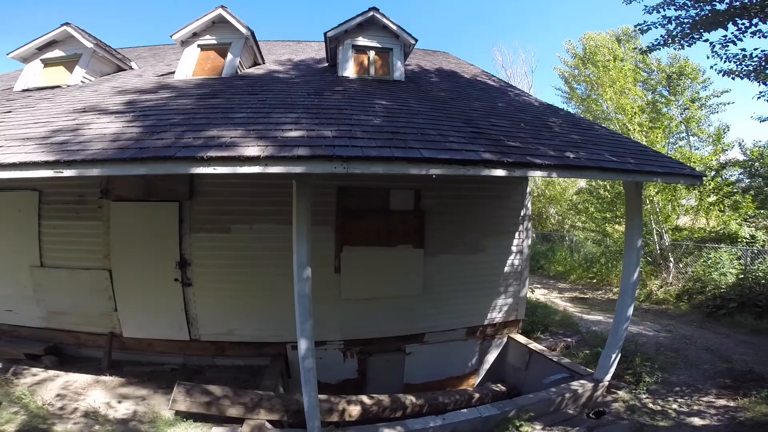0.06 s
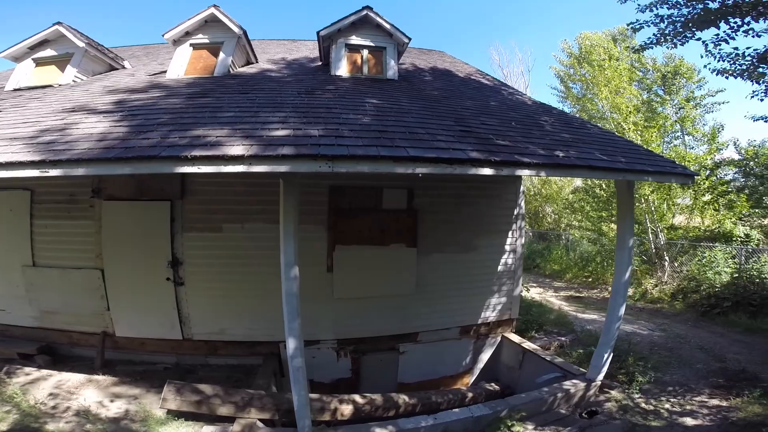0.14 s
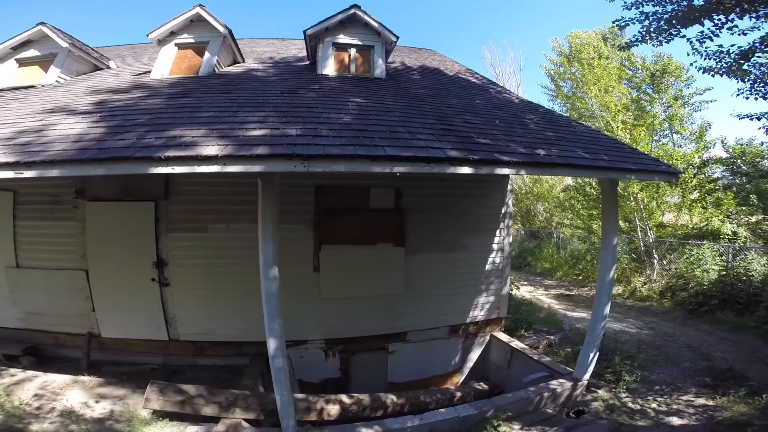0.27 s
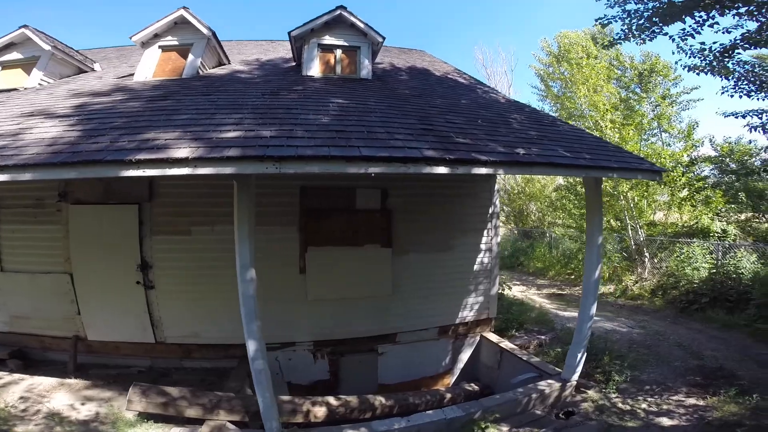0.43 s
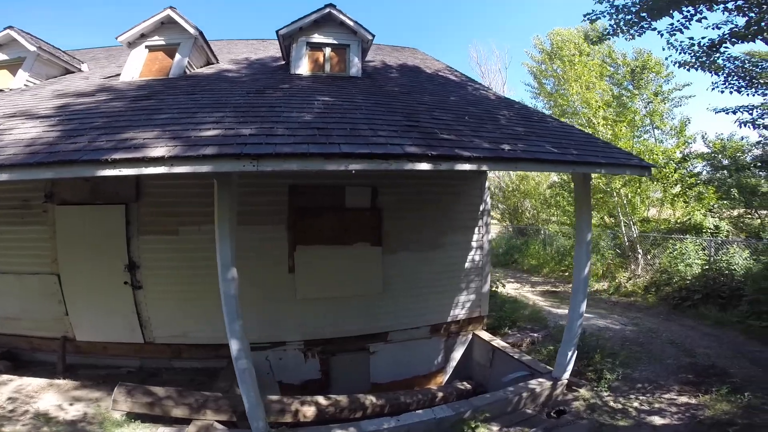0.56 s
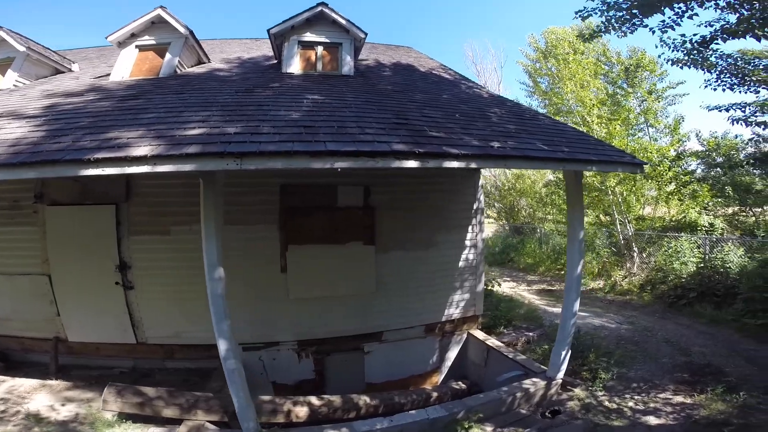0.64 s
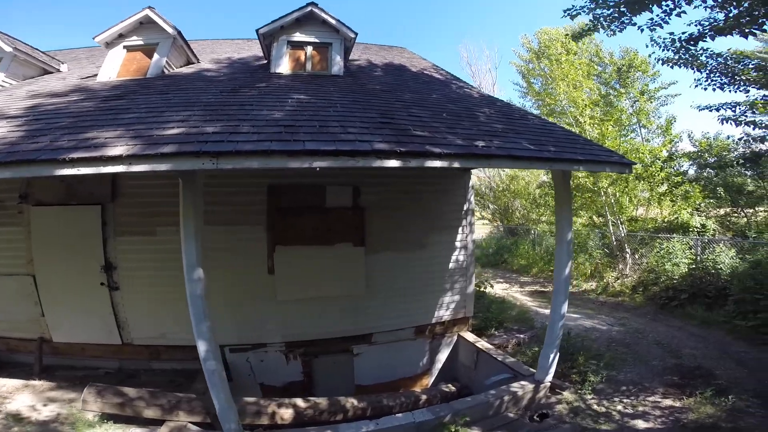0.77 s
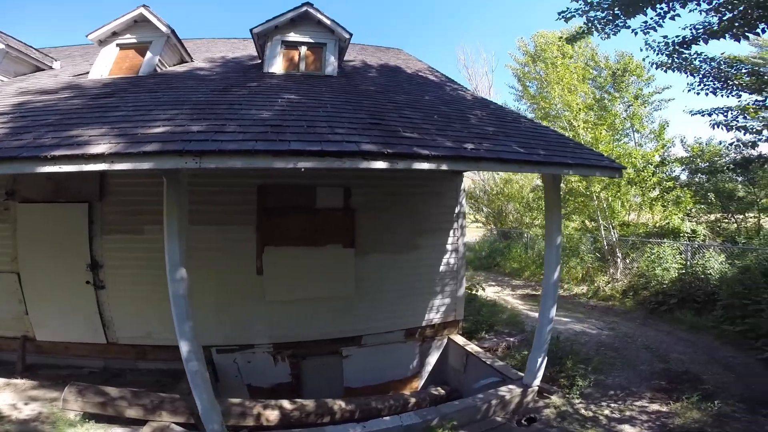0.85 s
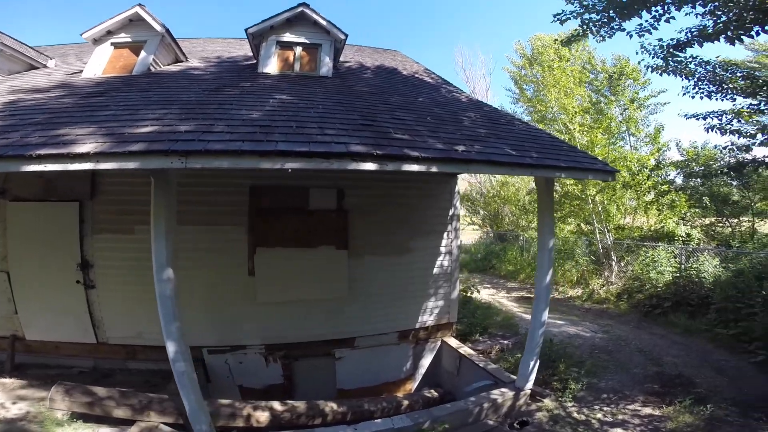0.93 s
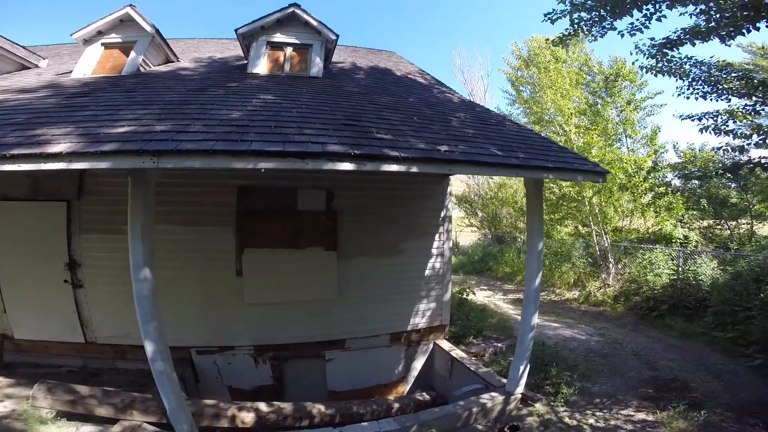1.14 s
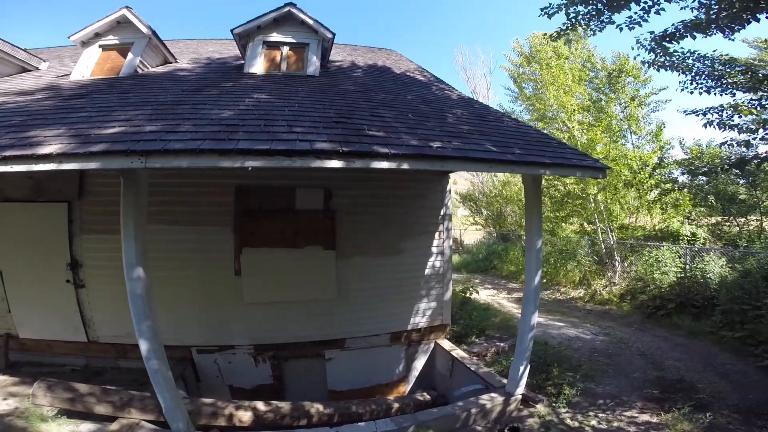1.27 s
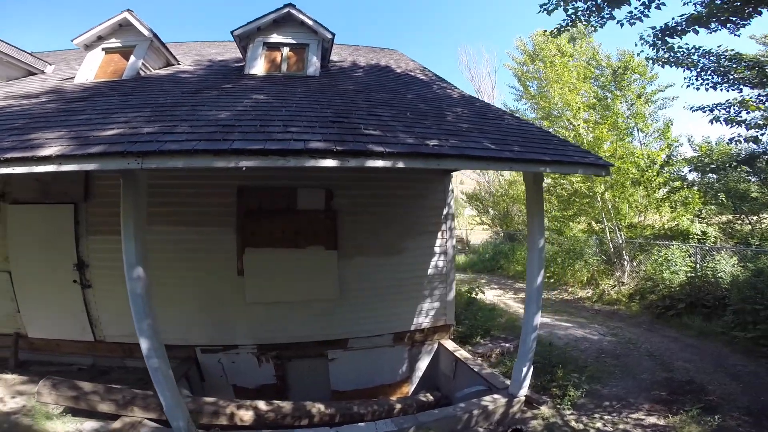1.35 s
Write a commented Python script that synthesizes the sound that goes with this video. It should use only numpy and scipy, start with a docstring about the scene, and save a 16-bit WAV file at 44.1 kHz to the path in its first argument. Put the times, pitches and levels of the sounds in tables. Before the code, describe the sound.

Sharp plastic clatter as a hand-held camera jolts in its mount, with light wind behind.

```python
"""A quick burst of plastic knocks and rattles: a hand-held camera is jolted in its mount, outdoors.
Each blow in the loose joint makes the housing crack, clatter and ring, and the grip gives a low thump.
Between the blows the joint rubs softly, in many tiny slips. Underneath lie the faint hiss of distant
leaves and the rumble of light wind on the microphone."""
import sys
import numpy as np
from scipy import signal
from scipy.io import wavfile
from scipy.ndimage import uniform_filter1d

SR = 44100
rng = np.random.default_rng(int(sys.argv[2]) if len(sys.argv) > 2 else 0)


def unload_wav(signal):
    """Save mono or channel-first audio to the path in sys.argv[1] as 16-bit WAV at rate SR, clipped to [-1, 1]."""
    wavfile.write(
        sys.argv[1],
        SR,
        np.round(np.clip(np.atleast_2d(signal).T, -1, 1) * 32767).astype(np.int16),
    )


N = 61739  # 1.4 s


def knock(level_db, thump_db, body_db, edge_db, snap_db, fizz_db, ping_hz, ping_db, clatter_db):
    """One blow shakes housing and grip; where it lands shapes the tone and adds a brief ping."""
    # centres of the thump, body, clack (two points), edge, snap and fizz bands: f/Hz
    band_hz = [150, 550, 1200, 1800, 2600, 4600, 9000]
    band_db = [thump_db, body_db, 0, 0, edge_db, snap_db, fizz_db]
    t = np.arange(SR // 3) / SR
    sound = crack_and_clatter(t, clatter_db) + amp(-6) * housing_ring(t) + amp(-2) * grip_thump(t)
    sound = colour(sound, list(zip(band_hz, band_db)))
    ping = mode(t, ping_hz, t60=0.01152) * rise(t, seconds=0.00017)
    sound += amp(ping_db) * unit(ping)
    low_cut = signal.butter(2, 87, "high", fs=SR, output="sos")  # the deepest bass is taken away
    return amp(level_db) * signal.sosfilt(low_cut, sound)


def crack_and_clatter(t, clatter_db):
    """A sharp click and the dense rattle after it, both coloured by the plastic housing."""
    # the housing's broad resonances: f/Hz, relative level/dB
    shell = [(40, -24), (120, 6), (320, -4), (400, -2.5), (500, -9.5), (670, -4), (780, -11.5),
             (870, -31.5), (950, -6), (1050, -4), (1400, 2), (1850, 0), (2060, -1), (2550, -4),
             (3200, -8.5), (3600, -5.5), (4350, -16), (5150, -13), (7300, -23.5), (8500, -27),
             (9300, -28.5), (11000, -30), (15000, -44)]
    crack = unit(colour(1. * (t == 0), shell))
    decay = fade(t, t60=0.0245) + amp(-20) * fade(t, t60=0.167)  # quick drop, then a quiet tail
    rattle = rng.choice([-1., 1.], len(t)) * rise(t, seconds=0.000305) * decay
    clatter = unit(colour(rattle, shell))
    return amp(-3) * crack + amp(clatter_db) * clatter


def housing_ring(t):
    """The struck housing rings with many short tones at once."""
    # pitch of each tone: f/Hz
    pitches = [397, 432, 700, 1038, 1213, 1385, 1574, 1728, 1847, 2211, 2490, 2713, 3530, 5090]
    # strength of each tone: relative level/dB
    levels = [-11, -13.5, -25.5, -13, -5, 3, -24, 0.5, 3, 7, -13, 1.5, -15, -28.5]
    # time each tone takes to fall by 60 dB: t60/s
    ring_times = [0.1395, 0.15, 0.26, 0.13, .07, 0.058, 0.052, 0.1004, 0.0836, 0.038, 0.0447, 0.042, 0.058,
                  0.044]
    tones = enumerate(zip(pitches, levels, ring_times))
    # every second tone starts by swinging the other way
    return unit(sum((-1) ** k * amp(db) * mode(t, hz, t60) for k, (hz, db, t60) in tones))


def grip_thump(t):
    """The grip shakes with a few low tones, heard as a thump."""
    # the grip's tones: f/Hz, relative level/dB, t60/s
    tones = [(101.3, -12, 0.1), (129.6, 4, 0.045), (176.6, -3.5, 0.177), (217.6, -17, 0.074)]
    return unit(sum(amp(db) * mode(t, hz, t60) for hz, db, t60 in tones))


def rub(length_s, level_db, slips_per_s=2400, spread_db=0.5):
    """The joint rubs in a short swell of tiny, random slips."""
    # tone of the rubbing joint: f/Hz, relative level/dB
    spectrum = [(100, -5), (400, 0.5), (520, -5.5), (680, 5), (860, -5.5), (1350, 8.5), (2050, -1),
                (2600, -1.5), (4500, -7), (5150, 2.5), (5700, -11), (6600, -7), (7500, -24.5), (8500, -10),
                (9300, -23.5), (15000, -27)]
    count = int(length_s * SR)
    slips = (rng.random(N) < slips_per_s / SR) * rng.choice([-1, 1], N)
    slips = slips * amp(spread_db * rng.standard_normal(N))
    swell = np.hanning(count) ** .5
    stroke = np.pad(slips[:count] * swell, (0, SR // 20))  # room to ring out
    return amp(level_db) * np.sqrt(count) * unit(colour(stroke, spectrum))


def leaves_and_wind():
    """Distant leaves hiss evenly while wind on the microphone makes a lumpy rumble."""
    # tone of the outdoor air: f/Hz, relative level/dB
    spectrum = [(12, -20.5), (20, 3.5), (40, -6.5), (46, -4), (60, -21), (91, -14.5), (146, -21),
                (255, -27), (301, -27), (367, -29.5), (849, -35), (1000, -35.5), (6720, -51), (13500, -62),
                (16000, -86.5)]
    # how the wind rumble rises and falls: t/s, level/dB
    rumble_curve = [(0.0, -50.5), (0.03, -34.5), (0.058, -50), (0.162, -45.5), (0.288, -49), (0.416, -44),
                    (0.45, -43), (0.614, -54), (0.692, -40.5), (0.728, -46.5), (0.864, -50), (0.926, -36.5),
                    (0.954, -47.5), (1.268, -48.5), (1.358, -39), (1.4, -62)]
    noise = colour(rng.standard_normal(N + SR), spectrum, size=16384)[SR:]
    noise = amp(-45) * np.sqrt(N) * unit(noise)
    low = signal.sosfiltfilt(signal.butter(3, 65.4, fs=SR, output="sos"), noise)
    hiss = noise - low
    # even out the low part over 0.08 s, so the curve sets its loudness
    steady = low / np.sqrt(uniform_filter1d(low ** 2, int(.08 * SR)) + 1e-12)
    rumble_db = np.interp(np.arange(N) / SR, *np.transpose(rumble_curve))
    return hiss + steady * amp(rumble_db)


def mode(t, hz, t60):
    """One tone that dies away."""
    return fade(t, t60) * np.sin(2 * np.pi * hz * t)


def rise(t, seconds):
    """Climbs from 0 towards 1; fewer seconds give a sharper start."""
    return 1 - np.exp(-t / seconds)


def fade(t, t60):
    """Falls by 60 dB in t60 seconds."""
    return np.exp(-np.log(1000) * t / t60)


def colour(x, points, size=4096):
    """Makes each pitch louder or softer along a curve of points: f/Hz, level/dB."""
    hz, db = np.transpose(points)
    bin_hz = abs(np.fft.fftfreq(size, 1 / SR))
    log_gain = np.log(amp(np.interp(np.log(bin_hz + 1), np.log(hz), db)))
    response = np.exp(np.conj(signal.hilbert(log_gain)))  # rings after a hit, never before
    taps = np.fft.ifft(response).real[:size // 2]
    return signal.fftconvolve(x, taps)[:len(x)]


def amp(db):
    """Turns decibels into a gain."""
    return 10 ** (np.asarray(db) / 20)


def unit(x):
    """Scales a sound to an energy of one."""
    return x / np.sqrt(np.sum(x ** 2) + 1e-20)


def add(mix, start_s, sound):
    """Mixes a sound in at a given time."""
    part = mix[max(round(start_s * SR), 0):][:len(sound)]
    part += sound[:len(part)]


def scene():
    """Knocks and rubs over the outdoor air, in one channel."""
    # blows on the housing: t/s, level/dB, thump/dB, body/dB, edge/dB, snap/dB, fizz/dB,
    # ping f/Hz, ping/dB, clatter/dB; thump to fizz are relative to the clack band near 1500 Hz
    blows = [(.102, -26.5, 6, 9.5, -11, -34, -12.5, 2186, -4, 0),
             (0.234, -7, 4, 2.5, 8, 16.5, 11, 4193, -0.5, -4.5),
             (0.238, 1.5, -6.5, 7.5, -3, -12.5, -19, 1719, -5, -8),
             (0.2452, -4, 4, 7.5, 3.5, -2, -5.5, 972, 0, -4),
             (.2525, -4.5, -13, 6, -7, -5, -8, 8290, -19, 3),
             (0.2615, -7.5, 3.5, -5, -25.5, 9.5, -4.5, 1800, -7.5, -5),
             (0.3063, -8, 3, 6, 14, 0.5, 6.5, 3640, 0, 3.5),
             (0.3069, -3, -15.5, -12.5, -11, -5.5, 1, 1519, 1.5, -1.5),
             (.3185, -11.5, 2, -14.5, -13, -5.5, -5, 2250, 1, 11.5),
             (0.3257, 8.5, 0, 5, 1, -29.5, -1, 1095, -10.5, -9.5),
             (0.3302, -2.5, 2, -5, 9.5, 10, 8, 2712, 3, -3),
             (0.3345, -10, 3.5, 0.5, -36, 7, -13.5, 9814, -9, 5),
             (0.353, -16.5, 14, -3.5, -20.5, -2.5, -1.5, 1490, -2.5, -5.5),
             (0.356, -21, 17, 23, -15, -9.5, 16, 616, -11, -4),
             (0.362, -16.5, 5, 14.5, -29, 0.5, 4, 1703, 5.5, -3.5),
             (0.3724, -17.5, 6, -23, 14, 3.5, 11.5, 1860, 10, -1.5),
             (0.3837, 8, -2.5, 0.5, -0.5, -10.5, -5, 5070, -17, -11.5),
             (0.3883, -6, -13, 0, -4.5, 9.5, -7, 1259, -0.5, 1),
             (0.4325, -28, -7, -25.5, 3.5, 1.5, 17, 2470, -3, 0.5),
             (0.4456, -14, 9.5, 0.5, 3.5, -2, 11.5, 5354, -7, 0),
             (0.4654, -23, 19.5, -5, 4.5, 7.5, 17.5, 1416, -1, -9),
             (0.4997, -35, -6, -5.5, 4.5, 12, 28, 6455, 1.5, -10),
             (0.5317, -32, -4.5, 5.5, 6.5, 3.5, 13, 1242, 4.5, -10)]
    # rubs of the joint: t/s, length/s, level/dB
    strokes = [(0.265, 0.0264, -44), (0.284, 0.0287, -44.5), (.395, 0.0152, -43), (0.44, 0.0201, -43),
               (0.46, 0.0315, -57.5)]
    mix = leaves_and_wind()
    for start_s, *blow in blows:
        add(mix, start_s, knock(*blow))
    for start_s, *stroke in strokes:
        add(mix, start_s, rub(*stroke))
    return mix[None]


def record(dry):
    """Cuts the highest treble, above 15700 Hz."""
    low_pass = signal.firwin(161, 15700, window=("kaiser", 9), fs=SR)
    return signal.oaconvolve(dry, low_pass[None], "same")


dry = scene()
out = record(dry)
unload_wav(out)
```